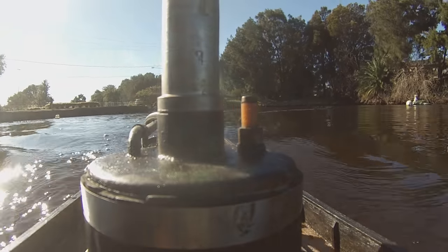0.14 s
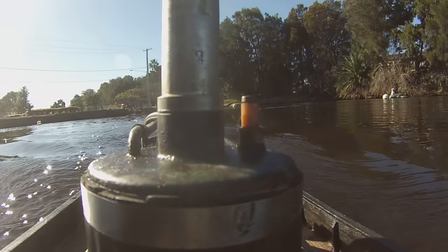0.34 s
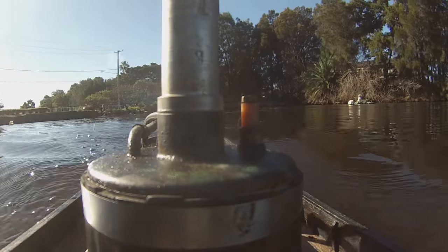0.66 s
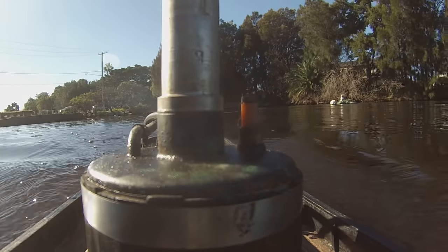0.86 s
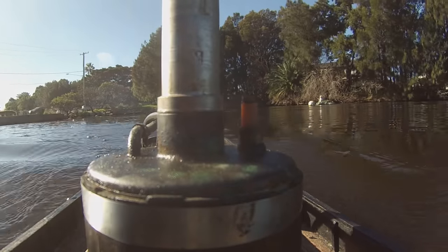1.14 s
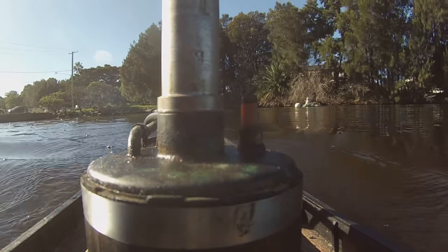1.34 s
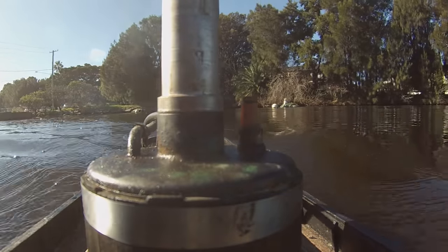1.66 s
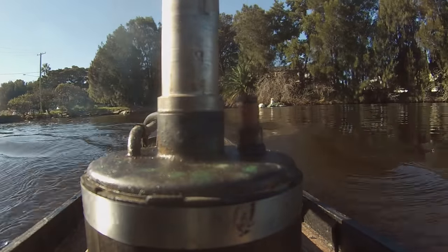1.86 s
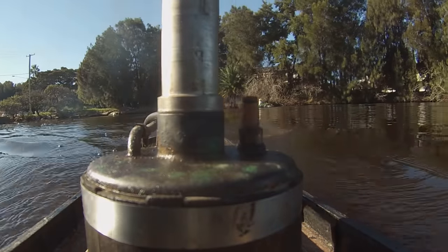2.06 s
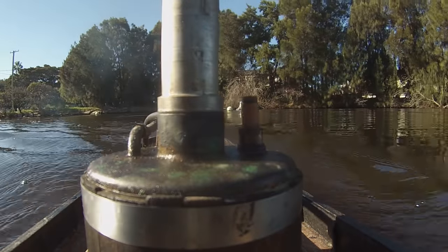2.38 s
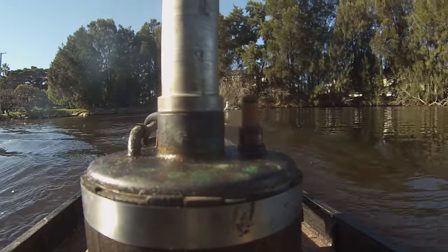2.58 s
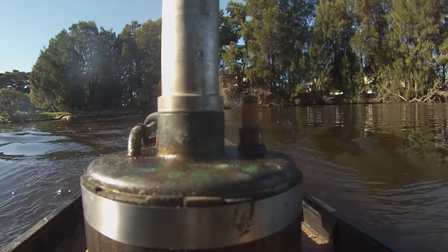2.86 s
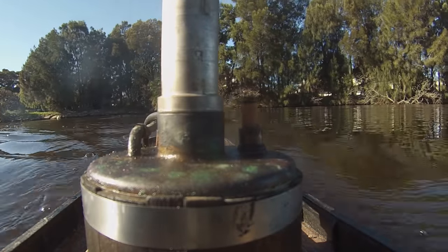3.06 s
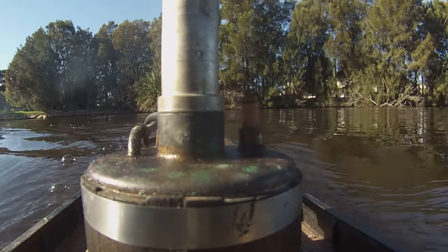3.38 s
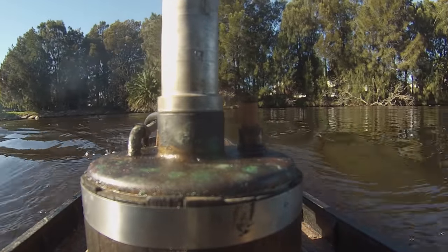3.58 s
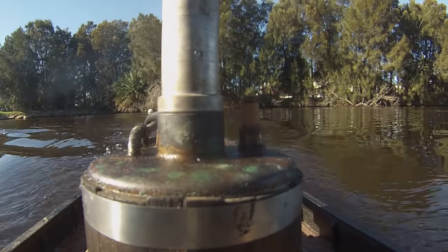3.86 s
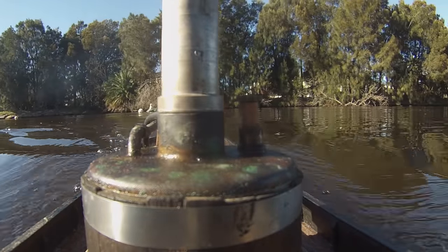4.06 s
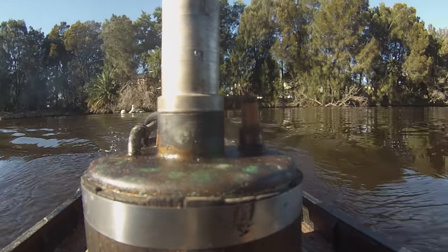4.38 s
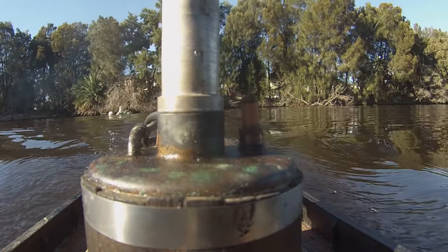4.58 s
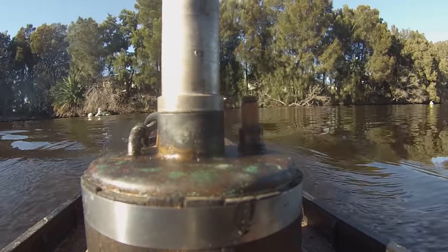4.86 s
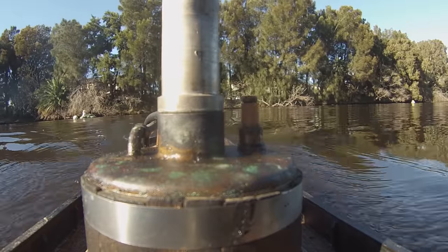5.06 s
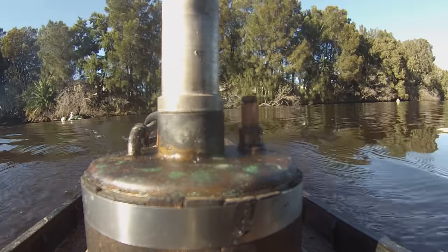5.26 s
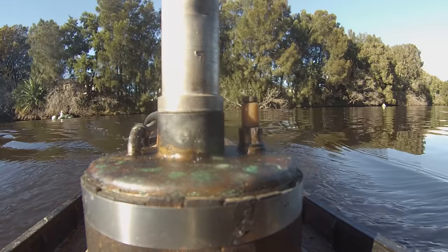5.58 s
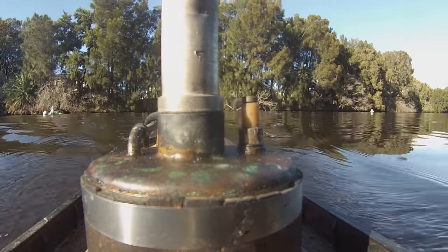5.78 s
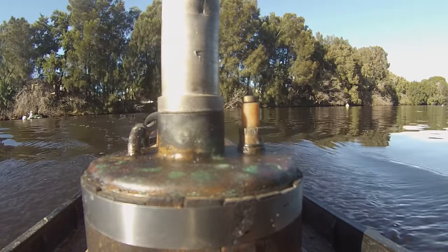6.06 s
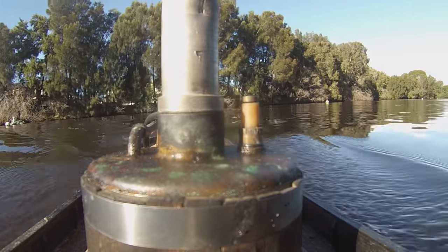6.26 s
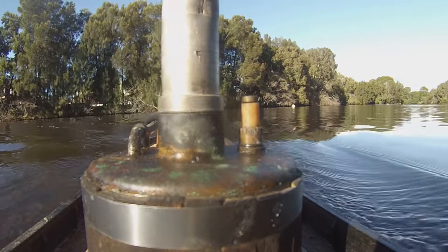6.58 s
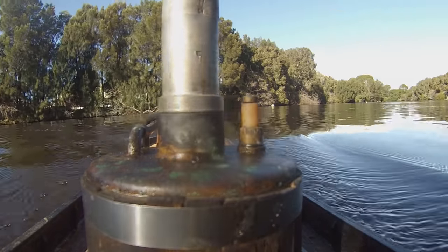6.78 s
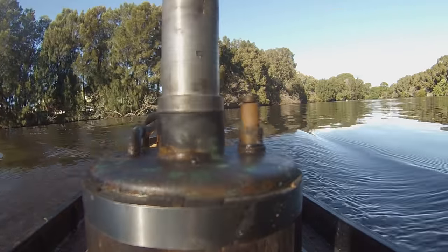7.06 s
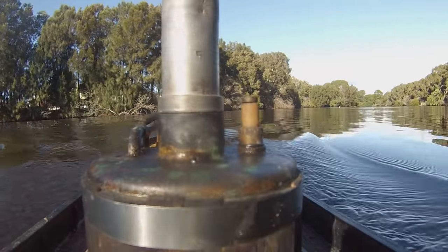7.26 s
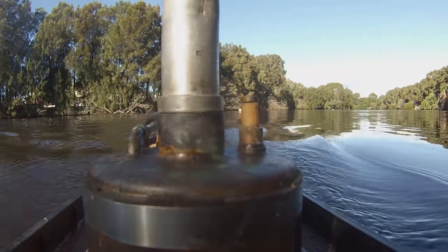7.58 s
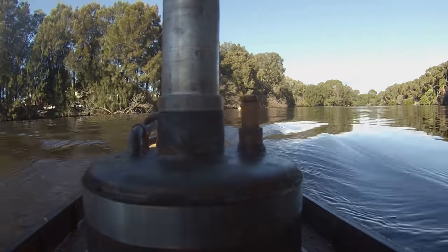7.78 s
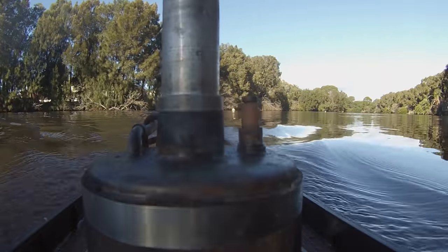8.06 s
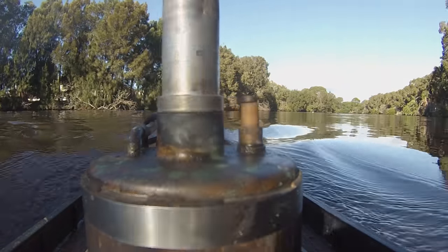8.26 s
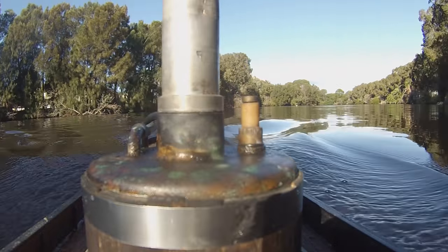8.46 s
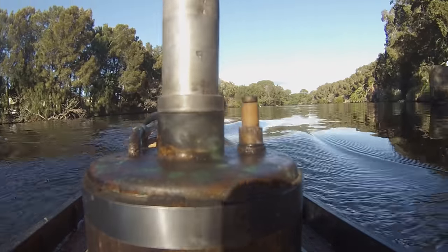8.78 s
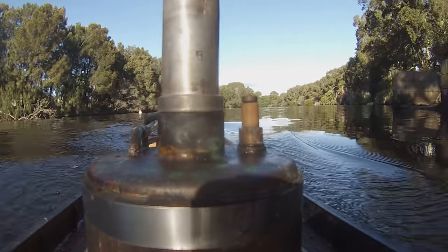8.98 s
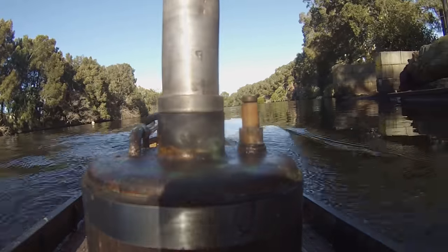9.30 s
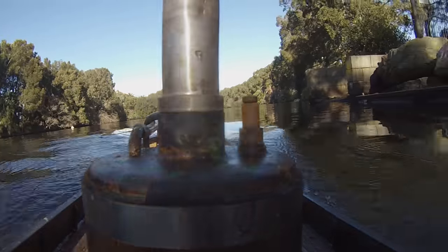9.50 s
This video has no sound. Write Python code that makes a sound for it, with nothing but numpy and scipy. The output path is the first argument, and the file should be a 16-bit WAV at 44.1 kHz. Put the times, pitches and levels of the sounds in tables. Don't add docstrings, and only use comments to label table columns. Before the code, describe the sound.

A model steamboat's engine drones low near 50 strokes a second, swelling slightly with ripples, while loose gear buzzes and chatters close by.

```python
import sys
import numpy as np
from scipy import signal
from scipy.fft import rfft, irfft
from scipy.io import wavfile
from scipy.ndimage import uniform_filter1d

SR = 44100
rng = np.random.default_rng(int(sys.argv[2]) if len(sys.argv) > 2 else 0)


def voltage_ratio(level):
    return 10 ** (np.asarray(level, float) / 20)


def unload_wav(signal):
    wavfile.write(
        sys.argv[1],
        SR,
        np.round(np.clip(np.atleast_2d(signal).T, -1, 1) * 32767).astype(np.int16),
    )


N = 424683

# time in seconds, strokes a second in Hz, propeller load heard as hum in dB.
ENGINE_PACE = [(0.0, 48.65, -12.5), (0.4, 50.75, -14.3), (1.2, 50.04, -13.1), (2.05, 49.4, -11.8),
               (2.6, 50.07, -13.2), (3.4, 49.71, -12.2), (4.2, 50.57, -13.6), (4.85, 50.34, -13.1),
               (5.75, 49.35, -11.4), (6.05, 50.02, -12.5), (6.6, 50.17, -12.6), (7.15, 50.47, -12.8),
               (7.35, 48.55, -9.9), (7.7, 49.54, -11.7), (8.3, 49.46, -11.8), (8.85, 51.02, -14.1),
               (9.25, 51.0, -13.2), (9.63, 50.33, -11.6)]
# middle in seconds, extra load in dB.
RIPPLES = [(0.51, 2.3), (0.73, 1.1), (0.98, 2.0), (1.56, -1.0), (1.67, 0.5), (1.83, -0.7), (2.44, 0.9),
           (2.7, 1.1), (3.04, -0.8), (3.14, 1.1), (3.82, 0.9), (4.08, 2.3), (4.23, 1.3), (4.43, 1.9),
           (4.63, 1.5), (4.95, 1.1), (5.1, 1.0), (5.32, 1.2), (5.67, 0.9), (5.9, 2.0), (6.17, -1.3),
           (6.27, 0.5), (6.84, 0.9), (7.5, -0.8), (7.82, 1.3), (8.03, 0.5), (8.38, 0.8), (8.75, 1.1),
           (9.02, 0.9), (9.4, 0.9)]
# multiple of a turn, level in dB, share of the load swing, side it pushes (signed).
STEADY_ORDERS = [(5, -37.5, -0.05, 1), (8, -39, 0.08, 1), (9, -46, -0.84, -0.82), (10, -54, 0.1, 1),
                 (11, -60, .2, -1), (12, -49.5, 0, 1), (13, -50.5, .1, -0.98), (14, -57, .1, -0.95),
                 (16, -61, .1, 0.8), (17, -50.5, .1, 0.5), (19, -59.5, .1, -0.62)]
# multiple of a turn, level against the crest level in dB.
CREST_ORDERS = [(4, -0.5), (6, -12.5), (7, -17)]
# pitch in Hz, width in Hz, level in dB.
HULL_MODES = [(168, 58, -51), (304, 13, -54), (340.5, 70, -44), (374.3, 115, -43.5), (427.4, 48, -39.5),
              (465, 62, -47.5), (519, 114, -50), (589, 68, -54.5), (720, 110, -51), (832, 230, -55)]
# pitch in Hz, width in Hz, level in dB.
SHELL_MODES = [(1004.4, 117, -41), (1115, 102, -42.5), (1362, 29, -57.5)]
# pitch in Hz, width in Hz, level in dB.
CASE_MODES = [(1461, 227, -51.5), (1786, 137, -51.5), (1860, 87, -43.5), (1930, 100, -48.5),
              (2012, 126, -50.5), (2203, 144, -58), (2393, 196, -63.5), (2647, 71, -67), (2810, 140, -67.5),
              (3016, 144, -66.5), (3294, 215, -65.5), (3686, 237, -56), (3910, 180, -62.5),
              (4070, 150, -63.5), (4230, 410, -70), (4884, 330, -69), (5340, 160, -75), (5844, 340, -65),
              (6160, 200, -73), (6400, 530, -77), (6870, 850, -76.5), (7700, 1230, -78), (9440, 450, -78.5),
              (9750, 300, -84), (8980, 800, -82.5), (10380, 900, -85.5), (11300, 1000, -85),
              (12200, 700, -92), (12800, 600, -90), (14200, 2200, -104)]
# pitch in Hz, width in Hz, depth from 0 to 1.
PATH_NOTCHES = [(1965, 40, .93), (2160, 40, .5), (3950, 60, .6), (4550, 40, .8), (4975, 25, .7),
                (6135, 30, .6), (6690, 40, .4)]
# time in seconds, peak in dB.
HULL_KNOCKS = [(1.561, -14.5), (2.728, -17), (2.889, -17.5), (3.452, -31), (3.875, -28.5), (4.282, -20),
               (6.007, -25), (6.282, -18), (6.345, -18.5), (6.942, -25), (7.569, -22), (7.939, -23),
               (8.237, -20), (9.586, -19.5)]
# time in seconds, peak in dB.
SHELL_KNOCKS = [(0.1625, -21), (1.3643, -20), (1.9849, -20), (2.0243, -19), (2.4304, -23), (2.9746, -18),
                (3.6556, -22), (3.9759, -22), (4.0352, -18), (4.0756, -22), (4.1355, -20), (4.4782, -20),
                (4.5965, -21), (4.7391, -20), (5.9693, -24), (6.0896, -18), (6.6717, -21), (6.7675, -21),
                (7.3507, -23), (7.3896, -19), (7.5732, -20), (8.1404, -17), (8.1818, -20), (8.3025, -21),
                (8.3833, -19), (9.4918, -22)]
# time in seconds, peak in dB.
CASE_KNOCKS = [(0.2798, -35), (0.462, -31), (1.624, -30), (1.8337, -27), (2.1204, -27), (2.4014, -30),
               (2.6327, -30), (3.9912, -33), (4.852, -23), (5.9264, -27), (6.168, -29), (6.3468, -35),
               (7.431, -32), (7.9887, -35)]
# time in seconds, pitch in Hz, level in dB.
BIRD_CHIRP = [
    (3.47, 10250, -90),
    (3.49, 10450, -70),
    (3.54, 10650, -69),
    (3.575, 10500, -68),
    (3.59, 10450, -90),
]


def engine_motion(t):
    ripple_s, flutter_db, sag_hz_per_db = .045, .35, .608
    stroke_hz, load_db = curves(ENGINE_PACE, t)
    chop = wander(22)
    chop = chop - uniform_filter1d(chop, size=SR // 6)
    surge_db = flutter_db * chop / np.std(chop)
    for middle, db in RIPPLES:
        surge_db = surge_db + db * np.exp(-.5 * ((t - middle) / ripple_s) ** 2)
    load_db = uniform_filter1d(load_db, size=SR // 40) + surge_db
    stroke_hz = stroke_hz - sag_hz_per_db * surge_db
    turn = 1.11 + np.pi * np.cumsum(stroke_hz) / SR
    felt_hz = uniform_filter1d(stroke_hz, size=SR // 3)
    return turn, felt_hz, load_db


def overtone_level(t, hz, load_db, base_db, slope, growth, wander_db, per_hz):
    mean_load_db, mean_hz = -12.5, 50
    from_load = slope * (load_db - mean_load_db)
    return base_db + from_load + growth * t + wander_db * wander(15) + per_hz * (hz - mean_hz)


def hum(turn, hz, load_db, crest_db, odd_db):
    mount_hz, mount_width_hz = 190, 30
    racing_hz, racing_db_per_hz = 50.2, -8

    def order(k):
        f = k * np.mean(hz) / 2
        level = 1
        if abs(f - mount_hz) < 45:
            level = voltage_ratio(racing_db_per_hz * np.maximum(hz - racing_hz, 0))
        lag = 2 * np.arctan2(mount_width_hz * f, mount_hz ** 2 - f ** 2)
        return -level * np.cos(k * turn - lag)

    swing_db = crest_db - np.mean(crest_db)
    out = voltage_ratio(load_db) * np.cos(2 * turn)
    out -= voltage_ratio(odd_db) * np.cos(3 * turn + 0.3)
    out += voltage_ratio(-38.5) * np.sin(turn)
    for k, db in CREST_ORDERS:
        out += voltage_ratio(crest_db + db) * order(k)
    for k, db, share, side in STEADY_ORDERS:
        out += voltage_ratio(db + share * swing_db + 2.5 * wander(8)) * side * order(k)
    return np.sqrt(2) * out


def chatter(turn):
    chatter_db = -27.5
    size = voltage_ratio(.6 * rng.exponential(size=(4, N)))
    taps = rng.standard_normal((4, N)) * size * (rng.random((4, N)) < .55)
    shared = taps[0]
    loose = voltage_ratio(0.91 * wander(60) + 0.46 * wander(150))
    hull_gate = slack(turn, lag=2.6, depth_db=4.0, sharp=1.5, uneven_db=.5, knock_db=1.5, knock_lag=.5)
    shell_gate = slack(turn, lag=2.65, depth_db=6.0, sharp=1.0, uneven_db=0, knock_db=.5, knock_lag=4.2)
    case_gate = slack(turn, lag=2.1, depth_db=6.3, sharp=2.8, uneven_db=1.4, knock_db=0, knock_lag=0)
    hull_hits = knocks(HULL_KNOCKS, size_db=11, hz=400, contact_s=.007)
    shell_hits = knocks(SHELL_KNOCKS, size_db=16, hz=1050, contact_s=.004)
    case_hits = knocks(CASE_KNOCKS, size_db=22, hz=1870, contact_s=.005)
    # resonances, hard knocks, gate, own unsteadiness in dB, share of taps it has alone
    parts = [(HULL_MODES, hull_hits, hull_gate, .8, .9),
             (SHELL_MODES, shell_hits, shell_gate, 1.0, .9),
             (CASE_MODES, case_hits, case_gate, .4, .8)]
    out = 0
    for own, (modes, hits, gate, own_db, alone) in zip(taps[1:], parts):
        drive = (shared + alone * own) / np.hypot(1, alone)
        drive = drive * loose * gate * voltage_ratio(own_db * wander(30))
        out = out + signal.fftconvolve(drive + hits, body(modes))[:N]
    return out * voltage_ratio(chatter_db) / np.std(out)


def slack(turn, lag, depth_db, sharp, uneven_db, knock_db, knock_lag):
    lull = (.5 + .5 * np.cos(2 * (turn - lag))) ** sharp
    lull_db = lull * (depth_db + uneven_db * np.cos(turn - lag))
    return voltage_ratio(knock_db * np.cos(turn - knock_lag) - lull_db)


def knocks(table, size_db, hz, contact_s):
    s, db = np.transpose(table)
    hits = np.zeros(N)
    hits[((s - contact_s / 2) * SR).astype(int)] = voltage_ratio(db + size_db)
    t = np.arange(0, contact_s, 1 / SR)
    buzz = np.sin(np.pi * t / contact_s) ** 2 * np.sin(2 * np.pi * hz * t)
    return signal.fftconvolve(hits, buzz)[:N]


def body(modes):
    size = 2 ** 13
    hz = np.fft.rfftfreq(size, 1 / SR)
    power = 1e-12
    for f, width, db in modes:
        power = power + voltage_ratio(2 * db) / (1 + (2 * (hz - f) / width) ** 2) ** 2
    for f, width, depth in PATH_NOTCHES:
        power = power * (1 - min(depth, .99) / (1 + (2 * (hz - f) / width) ** 2))
    cepstrum = irfft(np.log(power) / 2)
    cepstrum[1:size // 2] *= 2
    cepstrum[size // 2 + 1:] = 0
    return irfft(np.exp(rfft(cepstrum)))[:size // 2]


def bird(t):
    s, hz, db = np.transpose(BIRD_CHIRP)
    pitch = np.interp(t, s, hz) + 60 * wander(150)
    level = voltage_ratio(np.interp(t, s, db, -150, -150))
    return level * np.sin(2 * np.pi * np.cumsum(pitch) / SR)


def wander(rate):
    hold = int(SR / rate)
    steps = np.repeat(rng.standard_normal(N // hold + 1), hold)
    return 0.65 * uniform_filter1d(uniform_filter1d(steps, hold), hold)[:N]


def curves(table, t):
    s, *columns = np.transpose(table)
    return [np.interp(t, s, column) for column in columns]


def scene():
    t = np.arange(N) / SR
    turn, hz, load_db = engine_motion(t)
    crest_db = overtone_level(t, hz, load_db, base_db=-32.5, slope=2.5, growth=0.42, wander_db=0.3, per_hz=-0.5)
    odd_db = overtone_level(t, hz, load_db, base_db=-35.5, slope=3, growth=0.31, wander_db=-3, per_hz=3.3)
    mix = hum(turn, hz, load_db, crest_db, odd_db) + chatter(turn) + bird(t)
    return mix[None]


def top_cut(x):
    return signal.sosfilt(signal.butter(12, 15100, fs=SR, output="sos"), x)


def record(dry):
    fade_s, top_hz = .002, 16500
    t = np.arange(N) / SR
    fade = np.clip(np.minimum(t, t[-1] - t) / fade_s, 0, 1)
    roll_off = signal.butter(8, top_hz, fs=SR, output="sos")
    mix = signal.sosfilt(roll_off, dry * fade)
    return top_cut(mix)


dry = scene()
out = record(dry)
unload_wav(out)
```